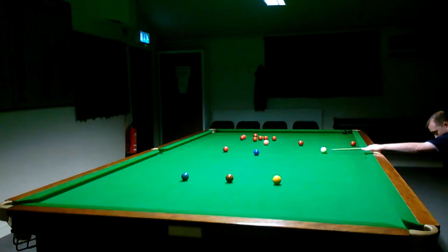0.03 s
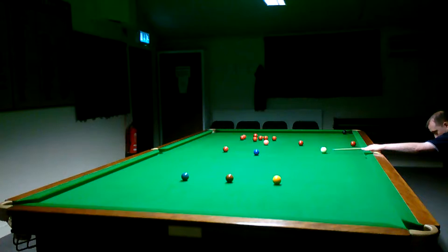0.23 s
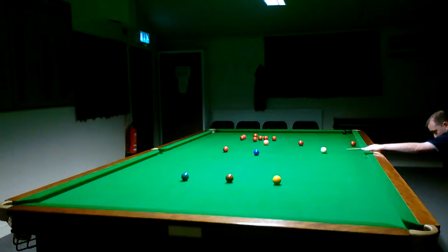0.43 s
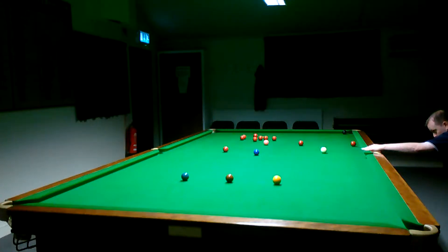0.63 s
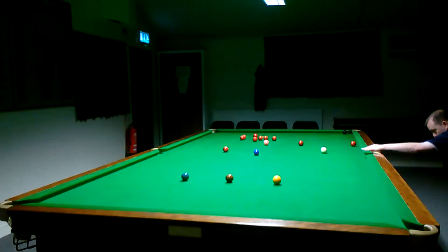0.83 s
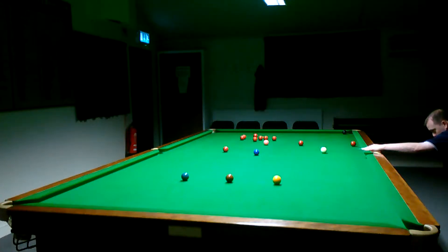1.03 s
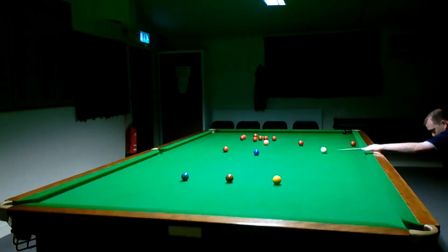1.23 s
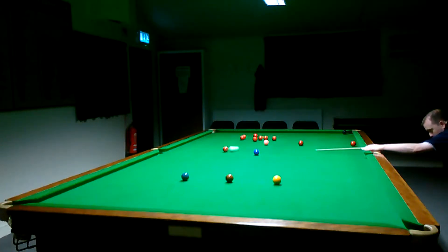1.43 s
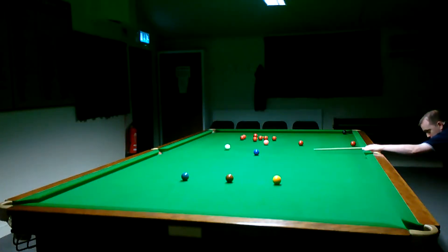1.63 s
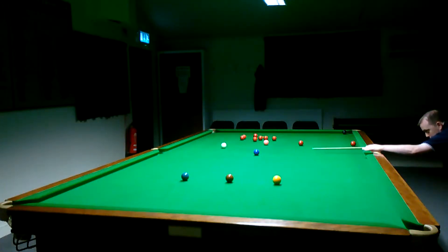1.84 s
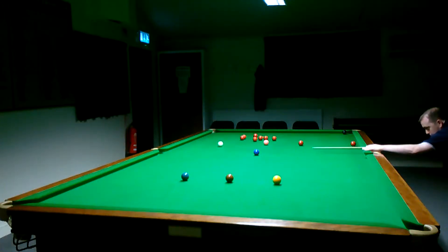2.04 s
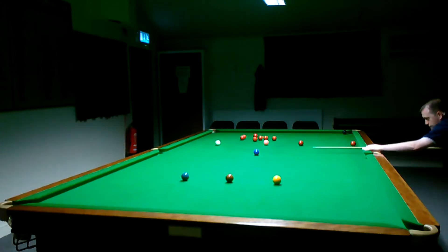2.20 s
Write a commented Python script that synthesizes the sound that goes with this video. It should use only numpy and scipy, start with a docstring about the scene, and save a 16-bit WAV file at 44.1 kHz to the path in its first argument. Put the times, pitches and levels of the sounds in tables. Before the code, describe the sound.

Snooker balls clack sharply after a cue strike, then one thumps into a pocket.

```python
"""A snooker shot in a quiet club room: the cue strikes the white ball and rings, the white clicks
against a red, and the red clatters into a pocket, making the table boom. The rolling balls rumble
softly, and two faint taps follow. Walls and ceiling throw each hit back. The microphone overloads
on the loudest hits, and its gain control turns everything down, so the background hiss drops too."""
import sys
import numpy as np
from scipy import signal
from scipy.fft import rfft, irfft, next_fast_len
from scipy.io import wavfile
from scipy.ndimage import uniform_filter1d

SR = 44100
rng = np.random.default_rng(int(sys.argv[2]) if len(sys.argv) > 2 else 0)


def dump_mix(stems):
    """Bounce the given channels to the path in sys.argv[1] as a 16-bit WAV at rate SR."""
    frames = np.atleast_2d(stems).T  # one column per channel
    limited = np.clip(frames, -1, 1)  # hard clip at full scale
    pcm = np.round(limited * 32767).astype(np.int16)
    wavfile.write(sys.argv[1], SR, pcm)


N = 99886
CUE_S, CLICK_S = 1.4006, 1.5759  # when the cue hits the white, and the white hits the red


def amp(db):
    """Turns decibels into a number to multiply a sound by."""
    return 10 ** (np.asarray(db) / 20)


def unit(x):
    """Scales a sound to an energy of one, so the levels that shaped it only set its tone."""
    return x / np.sqrt(np.sum(x ** 2) + 1e-20)


def read(points, hz):
    """Looks up a value between a table's rows, with frequency spaced by octaves."""
    f, value = np.transpose(points)
    return np.interp(np.log(hz + 1), np.log(f + 1), value)


def add(mix, s, sound, db=0):
    """Mixes a sound in at s seconds, turned up or down by db."""
    part = mix[max(round(s * SR), 0):][:len(sound)]
    part += amp(db) * sound[:len(part)]


def fade(t, t60):
    """A dying-away curve: t60 is the time it takes to fall by 60 dB."""
    return np.exp(-np.log(1000) * t / t60)


def noise(colour):
    """Steady noise of power one; its colour says how strong each frequency is."""
    size = next_fast_len(N, True)
    gain = amp(read(colour, np.fft.rfftfreq(size, 1 / SR)))
    x = irfft(rfft(rng.standard_normal(size)) * gain, size)[:N]
    return x / x.std()


def pulse(colour, size=4096):
    """One sharp hit: the shortest pulse with the given colour."""
    log_gain = np.log(amp(read(colour, abs(np.fft.fftfreq(size, 1 / SR)))))
    spectrum = np.exp(np.conj(signal.hilbert(log_gain)))  # packs the energy at the start
    return unit(np.fft.ifft(spectrum).real[:size // 2])


def ring(modes):
    """A struck object rings with its own set of fading tones, called modes."""
    t = np.arange(SR // 2) / SR
    return unit(sum(amp(db) * fade(t, t60) * np.sin(2 * np.pi * hz * t + k * np.pi)
                    for k, (hz, db, t60) in enumerate(modes)))


def scatter(x, t60, rise_s, size=6000):
    """Smears a sound into a short, dense burst of echoes."""
    t = np.arange(size) / SR
    burst = rng.standard_normal(size) * (1 - np.exp(-t / rise_s)) * fade(t, t60)
    return unit(signal.fftconvolve(x, burst))


def room(x, full_s=.05, rise_s=.014, size=256):
    """The room's echoes thicken until full_s; low notes linger and high ones die first."""
    # how long the room rings (f/Hz, t60/s)
    decay_times = [(100, 0.61), (200, 0.59), (400, 0.6), (1000, 0.34), (2800, 0.3), (7000, 0.32),
                   (11000, 0.16), (15000, .2)]
    age = np.arange(SR) / SR
    chance = np.clip((age / full_s) ** 2, .4, 1) * 8000 / SR  # up to 8000 echoes a second
    echoes = (rng.random(SR) < chance) * rng.choice([-1., 1.], SR) / np.sqrt(chance)
    hz, t, bands = signal.stft(echoes, SR, nperseg=size)
    bands = bands * fade(t, read(decay_times, hz)[:, None])
    tail = signal.istft(bands, SR, nperseg=size)[1][:SR]
    return unit(signal.fftconvolve(x, tail * (1 - np.exp(-age / rise_s))))


def hiss(level_db=-61, start_s=.072):
    """Steady room noise and microphone hiss, with thin, wavering electrical whines."""
    # room noise and hiss (f/Hz, level/dB)
    colour = [(18, -67.5), (30, -35.5), (107, -13.5), (190, -11.5), (222, -8), (426, -2), (460, -2),
              (567, -3.5), (1110, -1.5), (7430, -11.5), (9390, -10.5), (10700, -13), (15000, -16)]
    # electrical whines (f/Hz, width/Hz, level/dB)
    whines = [(7900, 15, -84.5), (9600, 200, -80), (12020, 3.2, -80.5)]
    t = np.arange(N) / SR
    steady = amp(level_db) * noise(colour)
    for hz, width, db in whines:
        drift = np.cumsum(rng.standard_normal(N)) * np.sqrt(2 * np.pi * width / SR)
        steady += amp(db) * np.sqrt(2) * np.sin(2 * np.pi * hz * t + drift)
    return steady * np.clip((t - start_s) / .02, 0, 1)


def rolling(rise_s=.06, fade_db_per_s=27.5):
    """A low rumble starts as each ball sets off and fades as it slows."""
    # balls rolling on cloth over slate (f/Hz, level/dB)
    colour = [(40, -49), (100, -23), (140, -5), (175, 2), (230, -2), (350, -2.5), (600, -14), (1200, -29),
              (4000, -46.5), (16000, -70)]
    # the white sets off, then the red (t/s, level/dB)
    starts = [(1.405, -42.5), (1.58, -51.5)]
    out = np.zeros(N)
    for s, db in starts:
        age = np.maximum(np.arange(N) / SR - s, 0)
        out += noise(colour) * np.minimum(age / rise_s, 1) * amp(db - fade_db_per_s * age)
    return out


def taps():
    """Light, distant taps on wood, heard mostly through their echoes."""
    # taps across the table (t/s, level/dB)
    hits = [(2.1226, -10.5), (2.226, -22)]
    # one tap (f/Hz, level/dB)
    colour = [(50, -39), (150, -22), (350, -7), (480, -26), (630, 2.5), (1000, -4), (2200, 1.5),
              (4000, -3.5), (6500, -5), (10000, -6.5), (15000, -17)]
    # tones of the tapped wood (f/Hz, level/dB, t60/s)
    wood_modes = [(630, -4.5, 0.25), (1790, -8, 0.25), (2350, -4, .15), (2700, -5, 0.13), (3460, -5.5, .12)]
    out, tap = np.zeros(N), pulse(colour)
    for s, db in hits:
        add(out, s, scatter(tap, t60=.095, rise_s=.011), db)
        add(out, s, ring(wood_modes), db - 3)
        add(out, s, room(tap), db)
    return out


def cue(low_cut_hz=120):
    """The cue's tip thuds on the white and its shaft rings; both echo round the room."""
    # thud of the tip (f/Hz, level/dB)
    thud_colour = [(40, -48), (100, -33), (170, -15.5), (350, -2), (700, -0.5), (1400, -6.5), (2200, 1),
                   (2800, -14), (3300, -3), (4000, -10.5), (6000, -14.5), (9500, -19), (12500, -34),
                   (16000, -38)]
    # tones of the shaft and tip (f/Hz, level/dB, t60/s)
    shaft_modes = [(1308, -8.5, .15), (1662, 7, 0.12), (1930, -15.5, 0.054), (2490, -20.5, 0.15),
                   (2460, -2, 0.17), (3083, -4, 0.12), (3088, 4, .14), (3268, 3.5, 0.2), (3540, -3.5, 0.11),
                   (4650, -14, 0.43), (5260, -14.5, 0.15), (5798, -14, 0.13), (7980, -17.5, .14)]
    out, thud, shaft = np.zeros(N), pulse(thud_colour), ring(shaft_modes)
    # the deep part of the thud arrives only through the room
    direct = signal.lfilter(*signal.butter(2, low_cut_hz, "high", fs=SR), thud)
    add(out, CUE_S, scatter(direct, t60=.12, rise_s=.00038), db=6)
    add(out, CUE_S, shaft, db=5)
    add(out, CUE_S, room(thud), db=4)
    early_ring = shaft * np.exp(-np.arange(len(shaft)) / SR / .024)
    add(out, CUE_S, room(early_ring), db=2)
    return out


def ball_click(level_db=17.5, contact_s=.00029, echo_cutoff_hz=5430):
    """Two hard balls squeeze together and spring apart in one click; duller echoes follow."""
    # how the balls turn that push into sound (f/Hz, level/dB)
    click_colour = [(60, -48.5), (300, -34), (800, -18), (1200, -12.5), (1800, 0), (2600, 1.5), (4000, 1),
                    (6000, -6.5), (8000, -5.5), (11000, 5.5), (15000, 6)]
    # echoes from table, ceiling and walls (delay/s, level/dB)
    echoes = [(.0006, -10.5), (.0035, -7), (.0078, -2), (.0108, -6), (.0336, -7), (.0462, -17), (.051, -25)]
    # a thin, bright tick just after the click (f/Hz, level/dB)
    tick_colour = [(100, -39.5), (5000, -27), (8000, 1.5), (9500, -6), (11000, 3.5), (12700, -12),
                   (14500, -2), (16000, -6.5)]
    out, t = np.zeros(N), np.arange(SR // 500) / SR
    force = np.maximum(np.sin(np.pi * np.minimum(t / contact_s, 1)), 0) ** 1.5
    click = unit(np.convolve(force, pulse(click_colour)))
    dull_click = signal.lfilter(*signal.butter(2, echo_cutoff_hz, fs=SR), click)
    add(out, CLICK_S, click, level_db)
    for delay, db in echoes:
        add(out, CLICK_S + delay, dull_click, level_db + db)
    add(out, CLICK_S, scatter(click, t60=.03, rise_s=.00033), level_db + .5)
    add(out, CLICK_S, room(click), level_db - .5)
    tick = scatter(pulse(tick_colour), t60=.006, rise_s=.0001)
    add(out, CLICK_S + .0028, tick, db=3.5)
    return out


def pocket(frame_t60=.079):
    """The red rattles in the pocket; its hardest knock makes the frame ring and the table boom."""
    # the red knocking about (t/s, level/dB)
    knocks = [(1.7366, -22), (1.7384, -5.5), (1.7409, 2.5), (1.7443, -4.5), (1.744, -22), (1.7484, -7),
              (1.7500, -3.5), (1.7503, 0), (1.7554, -27)]
    # one knock (f/Hz, level/dB)
    knock_colour = [(60, -34.5), (200, -38), (450, 7), (900, 1.5), (1800, 12.5), (2800, -8.5), (4500, -28),
                    (7000, -21), (11000, -51.5), (16000, -65)]
    # the rattle around each knock (f/Hz, level/dB)
    rattle_colour = [(60, -39), (250, -22), (500, 3.5), (1000, 6.5), (1200, -10.5), (1800, -3.5), (2800, 3),
                     (4800, -12.5), (6500, -16.5), (11000, -27.5), (16000, -42.5)]
    # tones of the pocket's frame (f/Hz, level/dB)
    frame_modes = [(340, 1.5), (500, 3), (582, 2.5), (660, -4), (776, 11.5), (890, 6.5), (1030, 4.5),
                   (1535, 11), (1660, 2.5), (1885, -6.5), (2280, -14), (2420, 3), (3110, -10),
                   (3370, -22.5)]
    # tones of the table's body (f/Hz, level/dB, t60/s)
    table_modes = [(322, -9, .35), (366, 2.5, 0.56), (411, -4.5, .38), (475.3, 10.5, .3), (598, 3.5, 0.5),
                   (664, -5, .45), (724, 0.5, 0.34), (827, 2, 0.24), (921, -13, .32), (962, 5, 0.24)]
    # the table's boom in the room (f/Hz, level/dB)
    boom_colour = [(50, -57), (120, -27), (240, -15.5), (330, 2.5), (400, 1), (550, -1.5), (900, 3),
                   (1200, -2.5), (1900, -1), (3000, -10), (5000, -26), (9000, -33.5), (12000, -36),
                   (15000, -65)]
    out, knock, rattle = np.zeros(N), pulse(knock_colour), pulse(rattle_colour)
    for s, db in knocks:
        add(out, s, knock, db + 20)
        add(out, s, scatter(rattle, t60=.028, rise_s=.00024), db + 12)
    hardest_s = max(knocks, key=lambda row: row[1])[0]
    frame = ring([(hz, db, frame_t60) for hz, db in frame_modes])
    add(out, hardest_s, frame, db=19.5)
    add(out, hardest_s, ring(table_modes), db=10)
    add(out, hardest_s, room(pulse(boom_colour)), db=20)
    return out


def scene():
    """The shot over the quiet room, in one channel."""
    return (cue() + rolling() + ball_click() + pocket() + taps() + hiss())[None]


def record(dry):
    """Gain control turns loud hits down and recovers slowly; peaks clip and the top treble is cut."""
    limit_db, cut_share, recover_db_per_s, react_s = -23, .39, 1, .0063
    power_db = 10 * np.log10(abs(uniform_filter1d(dry[0] ** 2, size=200)) + 1e-12)
    wanted_cut_db = cut_share * np.maximum(power_db - limit_db, 0)
    recovery_db = np.arange(N) * recover_db_per_s / SR
    held_cut_db = np.maximum.accumulate(wanted_cut_db + recovery_db) - recovery_db
    smoothing = np.exp(-1 / (react_s * SR))
    cut_db = signal.lfilter([1 - smoothing], [1, -smoothing], held_cut_db)
    clipped = np.clip(dry * amp(-cut_db), -1, 1)
    treble_filter = signal.firwin(255, cutoff=15400, window=("kaiser", 8), fs=SR)
    return signal.oaconvolve(clipped, treble_filter[None], "same")


dry = scene()
out = record(dry)
dump_mix(out)
```